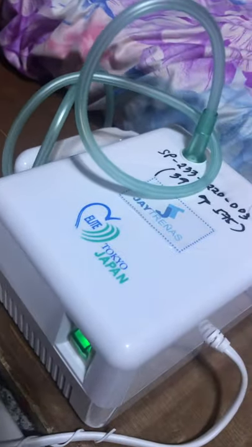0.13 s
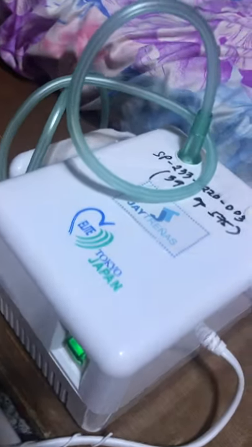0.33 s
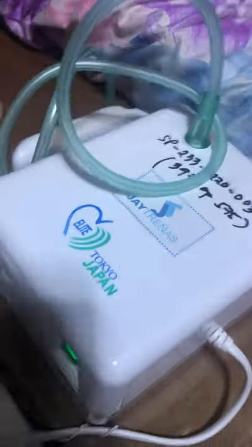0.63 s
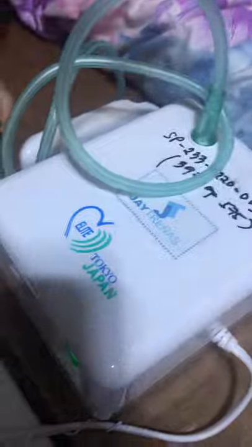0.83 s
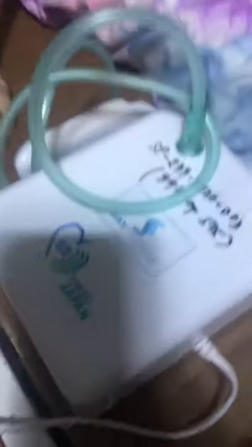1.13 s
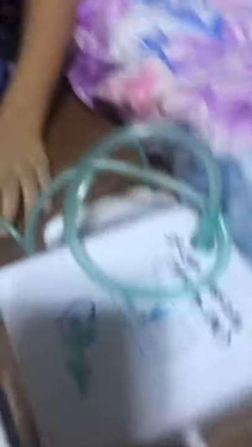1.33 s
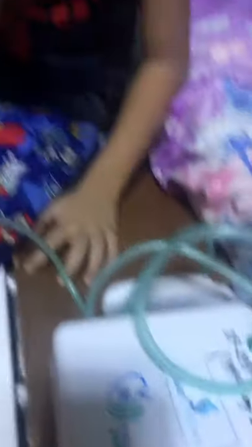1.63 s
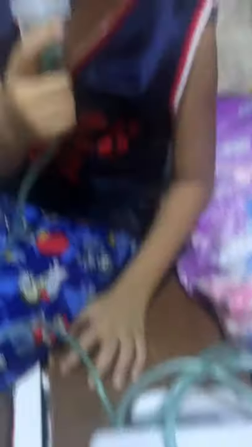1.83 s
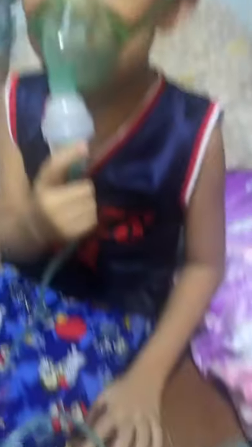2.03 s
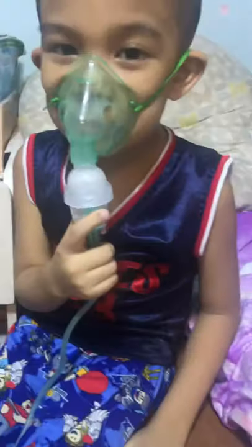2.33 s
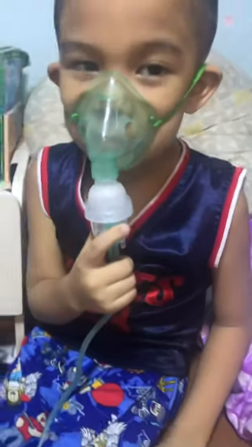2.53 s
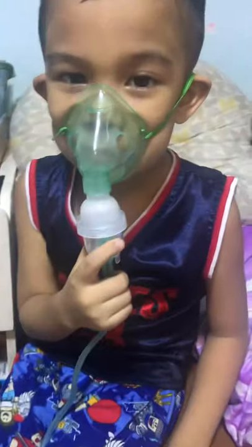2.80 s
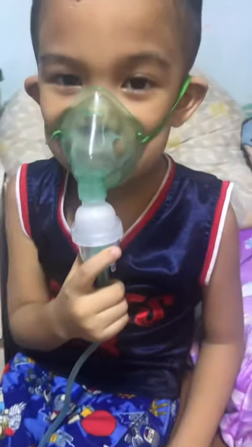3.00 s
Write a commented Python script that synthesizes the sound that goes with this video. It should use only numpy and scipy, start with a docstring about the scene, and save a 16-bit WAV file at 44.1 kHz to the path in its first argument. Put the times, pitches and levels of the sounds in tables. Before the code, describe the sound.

A nebulizer runs steadily in a small room, its compressor humming with a fast, rattling buzz. As the microphone moves from the case to the mask, the motor softens slightly and a high, whistling air hiss grows.

```python
"""In a small room, a nebulizer runs steadily while the microphone moves from its case to the mask.
Each turn of the piston compressor's shaft shakes the case, rattles the linkage, puffs air through
a valve and ends in a tick. The motor whines and hums with the mains over a rumble of cooling air.
The air jet in the mask hisses on, with narrow whistles that grow as the microphone comes near."""
import sys
import numpy as np
from scipy import signal
from scipy.fft import rfft, irfft
from scipy.io import wavfile
from scipy.ndimage import uniform_filter1d, map_coordinates

SR = 44100
rng = np.random.default_rng(int(sys.argv[2]) if len(sys.argv) > 2 else 0)


def output_pcm(signal):
    """Save a mono or channel-first signal as 16-bit PCM at the path in sys.argv[1].

    Samples are clipped to [-1, 1] before scaling.
    """
    pcm = np.clip(np.atleast_2d(signal).T, -1, 1) * 32767
    wavfile.write(sys.argv[1], SR, np.round(pcm).astype(np.int16))


N = 139356
SHAFT_HZ, MAINS_HZ, ROTOR_BARS = 50.9, 60, 17

# Tone colours: how strong low and high notes are next to each other (f/Hz, level/dB)
RUMBLE_COLOUR = [(20, -40), (45, -37), (100, -13.5), (300, -11), (450, -7.5), (570, 5), (770, -9.5),
                 (850, 2.5), (930, 1.5), (1080, -5), (1200, -4), (1450, -14.5), (3000, -31), (8000, -51)]
HISS_COLOUR = [(1400, 5), (2200, 0.5), (2800, 2), (3900, 4), (4700, -3.5), (5400, -0.5), (6100, -5),
               (7300, 6), (9200, -1), (11000, 0.5), (12150, -4.5), (13400, 5), (16000, 2.5)]
CHATTER_COLOUR = [(30, -67), (1200, -21.5), (1700, 5), (2050, -8), (2400, -2), (2750, 8), (3300, 2),
                  (4000, -11.5), (4700, -2.5), (7000, -9), (12000, -34)]
PUFF_COLOUR = [(30, -48), (600, -14), (1500, -4.5), (2700, -1), (3450, -12.5), (3900, 6.5), (4700, -11.5),
               (6500, -0.5), (8000, 1), (9400, -3.5), (11000, 1.5), (12250, -4.5), (13500, -12),
               (16000, -12.5)]
PUFF_TOP_COLOUR = [(30, -70), (11500, -40), (12600, -15), (13100, -2), (13600, -2), (14300, 0),
                   (14800, 1.5), (15700, -4), (17000, -29)]
TICK_COLOUR = [(30, -53), (500, -43), (1500, 1), (2700, 0), (3500, -10), (4800, -4), (6900, 1), (8000, -11),
               (9500, -18), (16000, -9)]

# Loudness over time, before each sound's own gain (t/s, level/dB)
HISS_FADE = [(0, -36.5), (1.6, -37), (2.3, -38), (3.16, -37)]
WHISTLE_FADE = [(0, -47.5), (1.2, -48.5), (1.5, -49), (1.84, -47), (1.96, -44), (2.04, -39), (2.25, -36),
                (2.7, -34.5), (3.16, -33.5)]
VALVE_FADE = [(0, -39.5), (.7, -38.5), (1.25, -38.5), (1.6, -39), (2.1, -43), (2.6, -45.5), (3.16, -44.5)]
PUFF_TOP_FADE = [(0, -37), (.48, -37), (.62, -37.5), (.95, -34.5), (1.35, -34), (1.7, -36.5), (2.1, -41.5),
                 (2.6, -44), (3.16, -43)]
WHINE_FADE = [(0.0, -36), (0.33, -37), (0.36, -32.5), (0.82, -36.5), (0.85, -31.5), (1.34, -32),
              (1.43, -28), (1.54, -32), (1.72, -31), (1.83, -36), (1.93, -30.5), (2.37, -40.5), (2.43, -37),
              (2.88, -40.5), (2.91, -37), (3.16, -41.5)]
CASE_FADE = [(0, -28.3), (.4, -29), (.68, -27.5), (.82, -28), (1.2, -27), (1.35, -29), (1.65, -28.5),
             (1.88, -31.5), (2.4, -32), (3.16, -32)]

# Notes at which the jet and mask ring (f/Hz, width/Hz, relative level/dB)
MASK_RESONANCES = [(3650, 120, -23), (5370, 220, -13), (7040, 440, -17), (8337, 500, 1.5),
                   (9930, 320, -0.5), (11400, 320, -12.5), (13300, 400, -16), (13800, 600, -14.5),
                   (14600, 800, -16), (15500, 400, -7)]
# The motor's magnetic tones (multiple of the shaft rate, added multiple of the mains, level/dB)
MAGNETIC_TONES = [(-1, 2, -71), (0, 2, -63), (1, 2, -58), (17, 2, -44.5), (18, 2, -48.5), (19, 2, -61.5),
                  (20, 2, -54), (17, 4, -54)]
# The case's tones, heard from two spots (multiple of the shaft rate, relative level/dB)
TONES_AT_CASE = [(1, -14), (2, -6.5), (3, -6.5), (4, -18.5), (5, -5), (6, -7.5), (7, -11.5), (8, -6),
                 (9, -12), (10, -6.5), (11, -11.5), (12, -15.5), (13, -3.5), (14, -9.5), (15, -16.5),
                 (16, -13.5), (17, 0), (18, -29.5), (19, -19), (20, -25.5), (21, -28), (22, -28), (23, -11),
                 (24, -16), (25, -19.5), (26, -15.5), (27, -19.5), (28, -44.5), (29, -22.5), (30, -49),
                 (31, -44), (32, -28)]
TONES_AT_MASK = [(1, -15.5), (2, -6.5), (3, -6), (4, -17.5), (5, -4), (6, -5), (7, -15), (8, -4), (9, -13),
                 (10, -7.5), (11, -10.5), (12, -12.5), (13, 0.5), (14, -10.5), (15, -24), (16, -11.5),
                 (17, 0), (18, -16.5), (19, -15.5), (20, -11.5), (21, -43), (22, -33), (23, -16.5),
                 (24, -36), (25, -34), (26, -27), (27, -29), (28, -29), (29, -29), (30, -38), (31, -29),
                 (32, -27)]
# The two piston strokes (place in the turn from 0 to 1, relative strength)
PISTON_STROKES = [(.454, 0.87), (.85, 0.827)]


def undb(db):
    """Turn decibels into a gain to multiply by."""
    return 10 ** (np.asarray(db) / 20)


def unit(x):
    """Scale a signal to an average strength (rms) of 1."""
    return x / np.sqrt(np.mean(x ** 2))


def fader(points):
    """A gain that follows (t/s, level/dB) points."""
    return undb(np.interp(np.arange(N) / SR, *np.array(points).T))


def noise():
    """Plain white noise."""
    return rng.standard_normal(N)


def colour(x, points):
    """Filter a signal through (f/Hz, level/dB) points; the result has rms 1."""
    hz, db = np.array(points).T
    f = np.fft.rfftfreq(N, 1 / SR)
    gain = undb(np.interp(np.log(f + 1), np.log(hz), db))
    cepstrum = irfft(np.log(gain), N)
    cepstrum[N // 2:] = 0  # the filter rings after a hit, never before
    return unit(irfft(rfft(x) * np.exp(2 * rfft(cepstrum)), N))


def drift(rate_hz):
    """A smooth random curve of rms 1 that changes about rate_hz times a second."""
    f = np.fft.rfftfreq(N, 1 / SR)
    return unit(irfft(rfft(noise()) / (1 + (f / rate_hz) ** 4), N))


def gate(turns, at, length, steepness=2):
    """Open once a turn; the centre (at) and the length are fractions of a turn."""
    offset = (turns - at + .5) % 1 - .5
    return np.exp(-np.abs(2 * offset / length) ** steepness)


def per_turn(turns, spread_db):
    """A random gain held for each turn."""
    gains = undb(spread_db * rng.standard_normal(N // 100))
    return gains[np.floor(turns).astype(int) + 1]


def cooling_rumble():
    """Cooling air and the case make a low rumble."""
    return colour(noise(), RUMBLE_COLOUR) * fader(CASE_FADE) * undb(-14)


def air_hiss():
    """Flowing air makes a broad hiss."""
    return colour(noise(), HISS_COLOUR) * fader(HISS_FADE)


def linkage_chatter(turns):
    """The linkage chatters under load, with the same rough pattern on every turn."""
    pattern = rng.standard_normal(int(SR / SHAFT_HZ))
    rub = map_coordinates(pattern, [turns % 1 * len(pattern)], mode="wrap")
    load = gate(turns, at=.697, length=.25) * per_turn(turns - .2, spread_db=1.5)
    return colour(rub * load, CHATTER_COLOUR) * fader(CASE_FADE) * undb(-17.5)


def magnetic_hum(turns, t, sway_db=3.3):
    """The motor's pulsing magnetic field adds faint tones beside the shaft's multiples."""
    out = 0
    for of_shaft, of_mains, db in MAGNETIC_TONES:
        cycles = round(of_shaft) * turns + round(of_mains) * MAINS_HZ * t + rng.random()
        out += unit(np.sin(2 * np.pi * cycles)) * undb(db + sway_db * drift(.59))
    return out


def valve_tick(turns, at=.91, decay_s=.00073):
    """The valve closes late in each turn with a snap and a tiny scrape."""
    since_s = (turns - at) % 1 / SHAFT_HZ
    closes = np.diff(since_s, prepend=0) < 0
    snap = unit(closes.astype(float))
    scrape = unit(np.exp(-since_s / decay_s) * noise())
    hits = (.88 * snap + scrape) * per_turn(turns - at, spread_db=2)
    return colour(hits, TICK_COLOUR) * fader(VALVE_FADE) * undb(-4.5)


def valve_puff(turns):
    """Each squeeze of the piston puffs air through the valve; the bright top beams from the case."""
    opening = gate(turns, at=.688, length=.27, steepness=6.6) * per_turn(turns, spread_db=1)
    puff = colour(opening * noise(), PUFF_COLOUR) * fader(VALVE_FADE)
    bright_top = colour(opening * noise(), PUFF_TOP_COLOUR) * fader(PUFF_TOP_FADE)
    return puff + bright_top


def jet_whistle(steepness=2.1, flicker_db=1.05):
    """Stored air streams steadily through the nozzle and makes the cup and mask ring."""
    f = np.fft.rfftfreq(N, 1 / SR)
    peaks = sum(undb(db) / (1 + (2 * (f - hz) / width) ** 2 / steepness) ** steepness
                for hz, width, db in MASK_RESONANCES)
    whistle = unit(irfft(rfft(noise()) * peaks, N))
    return whistle * undb(flicker_db * drift(6.8)) * fader(WHISTLE_FADE) * undb(3)


def rotor_whine(turns):
    """The bars of the spinning rotor whine, swelling once a turn with the load."""
    tone = -np.cos(2 * np.pi * ROTOR_BARS * turns)
    flutter = .11 * drift(53)
    throb = .12 * np.cos(2 * np.pi * (turns - PISTON_STROKES[0][0]))
    return unit(tone * (1 + flutter + throb)) * fader(WHINE_FADE) * undb(2.5)


def case_hum(turns, t):
    """Two strokes a turn shake the case; the mix of its tones shifts as the microphone moves."""
    move_middle_s, move_length_s = 1.96, 1
    lag_s, lag_hz = .01238, 378.8  # low notes leave the case late
    sway_db, unsteady_hz = 1.5, 775  # higher tones waver more, up to this pitch
    toward_mask = np.clip((t - move_middle_s) / move_length_s + .5, 0, 1)
    hum = 0
    for (multiple, case_db), (_, mask_db) in zip(TONES_AT_CASE, TONES_AT_MASK):
        multiple = round(multiple)
        if multiple == ROTOR_BARS:  # rotor_whine plays this note
            continue
        hz = multiple * SHAFT_HZ
        push = sum(size * np.exp(-2j * np.pi * multiple * at) for at, size in PISTON_STROKES)
        lag = 2 * np.pi * lag_s * lag_hz * (1 - np.exp(-hz / lag_hz))
        angle = 2 * np.pi * multiple * turns + np.angle(push) - lag
        unsteady = min(hz / unsteady_hz, 1)
        db = case_db + (mask_db - case_db) * toward_mask + sway_db * unsteady * drift(2.5)
        flutter = .15 * unsteady * drift(29) * np.cos(angle + np.pi / 4)
        hum += undb(db) * (np.cos(angle) + flutter)
    power = uniform_filter1d(uniform_filter1d(hum ** 2, size=8000), size=8000)
    even_hum = hum / np.sqrt(power)
    return even_hum * fader(CASE_FADE) * undb(1)


def scene():
    """One slightly wobbling shaft times the whole compressor; the air noises run alongside."""
    t = np.arange(N) / SR
    turns = SHAFT_HZ * t + .0027 * drift(1.2)
    hums = case_hum(turns, t) + rotor_whine(turns) + magnetic_hum(turns, t)
    pumping = valve_puff(turns) + valve_tick(turns) + linkage_chatter(turns)
    air = cooling_rumble() + jet_whistle() + air_hiss()
    return (hums + pumping + air)[None]


def record(dry, top_hz=15780):
    """Cut away the very highest treble."""
    return signal.sosfilt(signal.ellip(12, .2, 80, top_hz, fs=SR, output="sos"), dry)


dry = scene()
out = record(dry)
output_pcm(out)
```